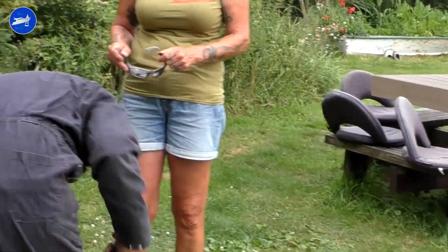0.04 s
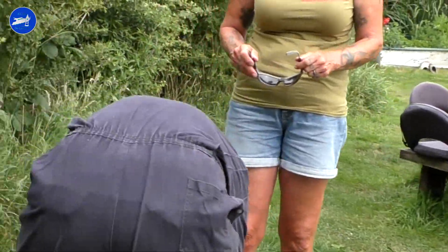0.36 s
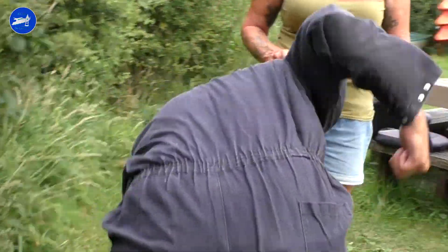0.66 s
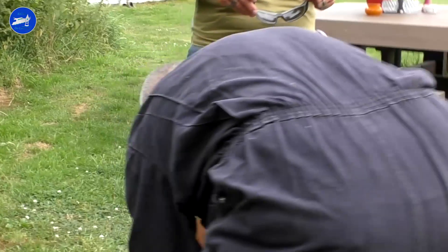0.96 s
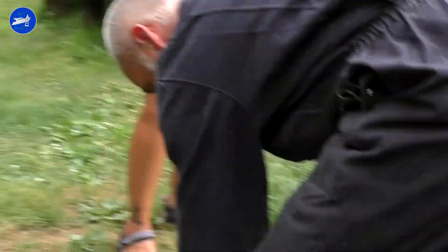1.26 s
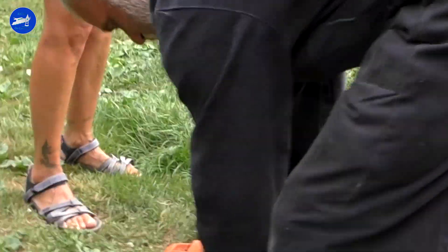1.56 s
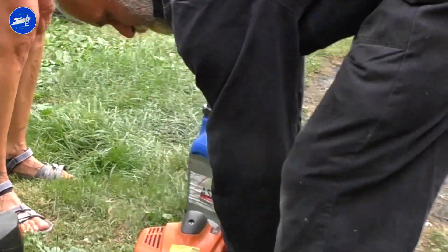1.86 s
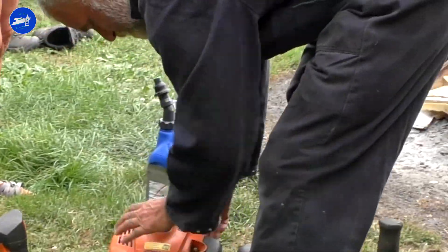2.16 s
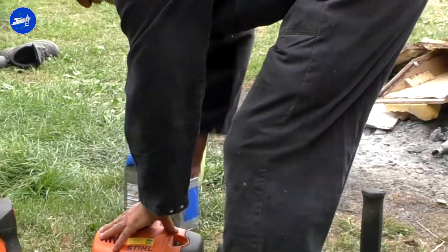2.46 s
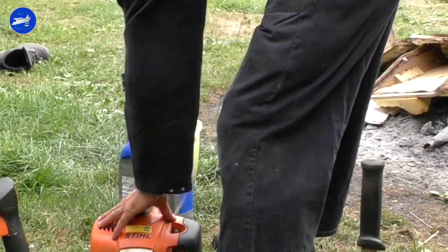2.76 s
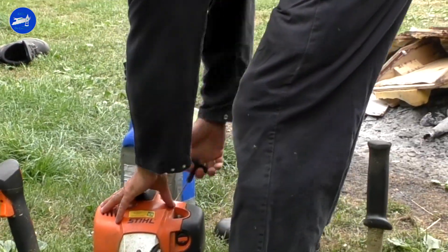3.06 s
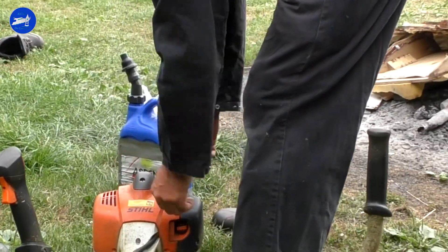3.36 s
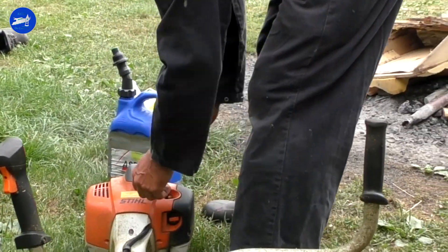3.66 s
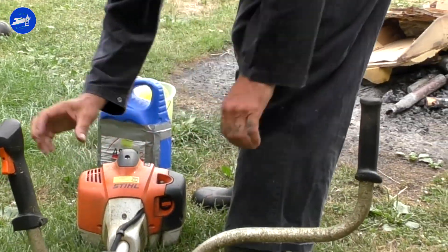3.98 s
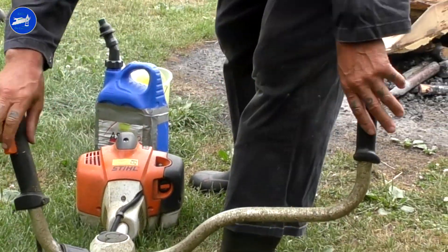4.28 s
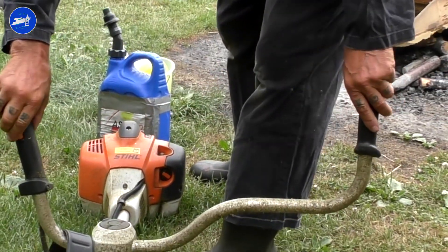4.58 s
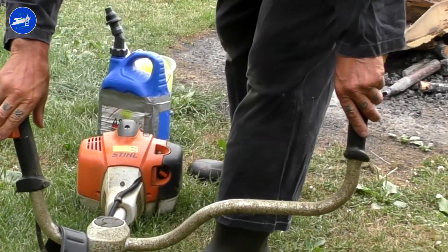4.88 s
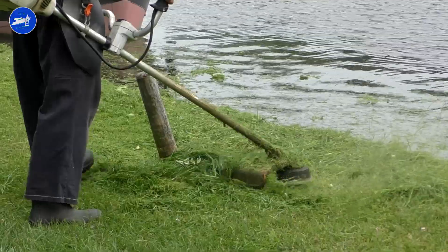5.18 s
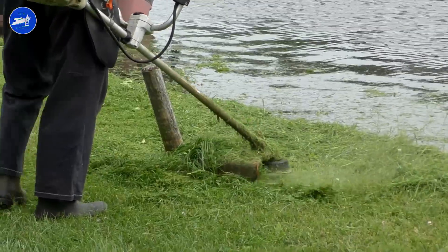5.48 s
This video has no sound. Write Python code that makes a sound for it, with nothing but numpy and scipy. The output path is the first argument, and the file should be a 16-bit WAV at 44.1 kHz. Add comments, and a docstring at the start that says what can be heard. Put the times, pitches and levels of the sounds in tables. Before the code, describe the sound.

A two-stroke petrol brush cutter is heard close up on a quiet lawn. At first the engine runs down, throbbing and rattling, with starter clacks until about 0.6 seconds and a faint bird behind. The rope whirrs at 0.7 seconds; the engine coughs unevenly, slows and dies with a few knocks by 2.1 seconds. In the lull the bird gives thin falling whistles and the starter clicks. Another pull at 2.7 seconds makes it catch at 3 seconds, popping with a tinny metallic ring and gathering speed. From 4.1 seconds the cutting line spins up with a rising swish; near 4.8 seconds the firing stops and it coasts. At 5.2 seconds the sound jumps abruptly to the machine working at high revs, a raspy buzz. From 5.4 seconds the line bites into grass with a dense patter and snapping stalks.

```python
"""A lawn, microphones close to a two-stroke petrol brush cutter. The engine runs down, a small bird calling
faintly behind it. The rope is pulled; the engine coughs and dies, and the bird calls in the lull. At 3 s
it catches, fires on every third turn and gathers speed, ringing its muffler and clutch drum. From 4.1 s
the cutting line spins up with a swish of eddies, then coasts. At 5.2 s we are abruptly with the machine
at work, every turn firing, and the line bites into the grass."""
import sys
import numpy as np
from scipy import signal
from scipy.fft import rfft, irfft
from scipy.io import wavfile
from scipy.ndimage import uniform_filter1d

SR = 44100
rng = np.random.default_rng(int(sys.argv[2]) if len(sys.argv) > 2 else 0)


def master_out(mix):
    """Clip the mix to full scale and print it as 16-bit PCM to the path in sys.argv[1]."""
    frames = np.transpose(np.atleast_2d(mix))
    ceiling = np.clip(frames, -1, 1)
    pcm = np.round(ceiling * 32767).astype(np.int16)
    wavfile.write(sys.argv[1], SR, pcm)


N = 243873
T = np.arange(N) / SR

# the quiet of the garden: (frequency [Hz], relative level [dB])
GARDEN = [(15, -54), (25, -32), (43, 5), (149, 2.5), (317, -6), (503, -10), (600, -26), (840, -20.5),
          (1330, -13.5), (3340, -23.5), (7110, -37), (12500, -34), (16000, -56)]
# bird notes: (start [s], length [s], glide [s], from [Hz], to [Hz], level [dB])
BIRD_NOTES = [(0.247, 0.12, .11, 3600, 3380, -62), (.44, 0.04, .04, 5000, 4850, -66),
              (1.986, 0.035, 0.025, 6900, 4500, -59), (2.325, 0.09, .042, 6560, 3650, -63),
              (2.43, .06, .06, 3980, 3930, -74)]
# left microphone over right: (frequency [Hz], level [dB])
LEFT_BIAS = [(300, 0), (1200, -.5), (4000, 1.6), (8000, 1), (14000, 3.8)]

# the rope running out or winding back: (start [s], end [s], whirr [dB], spool song, relative [dB])
ROPE_RUNS = [(-.1, -0.019, -32.5, -48.5), (0.676, 0.827, -27, -56), (2.01, 2.222, -56.5, -106),
             (2.707, 2.862, -29, -59)]
# starter pawls: (time [s], relative level [dB], t60 [s], pitch [Hz], cover clink offset [dB])
PAWL_CLACKS = [(0.179, -40.5, 0.24, 1140, -15), (0.384, -46, 0.084, 2250, -6),
               (0.396, -41, 0.27, 1470, -19), (0.426, -51.5, 0.25, 2120, 6.5), (0.441, -48, 0.12, 1600, -8),
               (0.474, -47.5, 0.074, 2420, -5), (0.492, -40, 0.54, 1360, -2), (0.567, -49, 0.14, 1500, -10),
               (0.574, -51, 0.08, 3000, -12), (0.588, -37.5, 0.11, 1150, -15),
               (0.613, -39.5, 0.25, 2980, -18), (1.966, -48, 0.07, 2100, -10), (2.025, -48, 0.056, 3260, 9),
               (2.036, -39.5, 0.096, 2240, -19), (2.18, -55, 0.06, 2480, -12),
               (2.514, -36.5, 0.32, 1530, -8.5), (2.594, -48, 0.59, 1830, -2), (2.622, -51, 0.1, 2100, 3)]
# jingles of the recoil spring; snaps of the starter and of stalks: (time [s], relative level [dB])
JINGLES = [(0.18, -61), (0.388, -69), (0.426, -69.5), (2.501, -67), (2.519, -69)]
SNAPS = [(0.58, -27), (0.781, -25.5), (5.42, -34), (5.461, -28), (5.5244, -28)]
# the last piston knock of each run-down: (time [s], crank speed [turns/s], relative level [dB])
LAST_KNOCKS = [(0.367, 9.24, -49.5), (2.119, 6.36, -44.5)]

# the spinning line's swish: (time [s], centre [Hz])
SWISH_PITCH = [(4.1, 2450), (4.33, 3915), (4.42, 4256), (4.55, 4627), (4.66, 4214), (4.78, 5080),
               (5.0, 3760), (5.212, 3250)]
# the exhaust at work in the grass: (time [s], note [dB], rasp, relative [dB])
WORK_LEVELS = [(5.208, -38.5, -37), (5.33, -35, -32), (5.43, -29, -31.5), (5.53, -39, -37)]
# its note: (multiple of the crank speed, relative level [dB])
EXHAUST_HARMONICS = [(1, 0), (2, -3), (3, -13), (4, -8), (5, -7), (6, -8), (7, -7), (8, -19), (9, -16),
                     (10, -12), (11, -4), (12, -13), (13, -16), (14, -15), (15, -9), (16, -9), (17, -15),
                     (18, -16)]

# the crank, one curve for each of three runs, then at work: (time [s], speed [turns/s])
RUN_SPEEDS = [
    [(-.1, 40), (.1, 19.3), (.4, 8)],
    [(.62, 41.4), (.68, 48.7), (.74, 49.7), (.93, 59.7), (1.1, 52.1), (1.3, 36.6), (1.36, 37.3),
     (1.5, 28.3), (1.57, 36), (1.65, 27.5), (1.745, 21), (2.15, 5.2)],
    [(2.65, 46), (2.8, 45.05), (2.89, 39.94), (2.99, 48.94), (3.09, 45.05), (3.14, 53.61), (3.22, 52.82),
     (3.534, 65.7), (3.59, 66.6), (3.67, 70.4), (3.85, 72.3), (4.05, 80.3), (4.2, 80.1), (4.35, 81.7),
     (4.54, 79.3), (4.68, 78.7), (4.73, 95.55), (5.0, 68), (5.21, 55)],
]
WORK_SPEED = [(5.21, 96), (5.32, 113), (5.41, 123), (5.53, 121)]
# the two tries that die, relative levels: (intake [dB], rattle [dB])
FAILED_TRIES = [(-27.5, -35), (-26, -31.5)]
# intake on the run that catches, falling as the throttle shuts: (time [s], relative level [dB])
WARM_INTAKE = [(2.651, -35), (2.68, -33), (3.2, -31.5), (4.3, -32.5), (4.62, -35.5), (4.75, -31),
               (4.82, -45), (5.21, -48)]
# the gulps of one cold turn: (lead on the main gulp [turns], relative level [dB])
COLD_GULPS = [(0, 0), (.25, -7.5), (.47, -8), (.72, -9.5)]
# the warm engine's smaller gulp: (crank speed [turns/s], lead on the main gulp [turns])
EARLY_GULP = [(45, .378), (54, .35), (62, .355), (71, .38), (81, .405)]
# stray firings before it catches: (time [s], crack, relative [dB], puff, relative [dB])
COUGHS = [(0.7328, -13, -36.5), (0.7916, -11.5, -40.5), (0.831, -17.5, -44), (0.8662, -18, -42.5),
          (0.899, -14.5, -42.5), (0.935, -22.5, -46), (0.967, -12, -41.5), (1.058, -11, -39.5),
          (1.1365, -10.5, -37), (1.3258, -17, -38), (1.4392, -23, -40.5), (1.5363, -17, -35),
          (1.705, -18, -46), (2.771, -26, -34.5), (2.837, -16, -33.5), (2.932, -16.5, -39)]

# spectra of the machine and the thrashed grass, heard close: (frequency [Hz], relative level [dB])
AIRBOX_COLD = [(30, -85), (55, -12), (90, -5), (140, 2), (210, 4), (310, 3.5), (400, -2.5), (490, -5.5),
               (580, -22), (680, -13), (900, -26.5), (1800, -107)]
AIRBOX_WARM = [(30, -61), (50, -15), (70, -4.5), (120, -5), (160, 0), (220, 5.5), (280, 4.5), (350, 3),
               (410, 3.5), (480, -2), (560, -13.5), (700, -30.5), (1800, -75)]
CASING = [(40, -94), (300, -11.5), (700, -9), (1100, 1.5), (1550, 7.5), (2000, 3), (2600, 0.5), (3600, -9),
          (5000, -12), (7500, -33.5), (15000, -53)]
HISS = [(100, -77), (1500, -22), (3000, 9), (4500, 4), (6300, 1), (7300, -3.5), (9000, 0), (12000, -3),
        (16000, -13)]
MUFFLER = [(40, -5), (400, -43), (900, 5.5), (1400, 2.5), (2000, 10), (2600, 1.5), (3500, 2.5), (4300, 5),
           (5400, 7), (6400, 5), (7400, -1.5), (9000, 2), (12000, 3), (16000, -10)]
CRACK = [(40, -66), (300, -25), (700, -40), (1300, 16.5), (2500, 16.5), (4200, 10), (7000, -17),
         (15000, -33)]
SNAP = [(60, -34), (400, -5), (1200, -3), (3000, 4.5), (5000, -1.5), (7500, -4.5), (11000, -2),
        (16000, -22)]
RASP = [(30, -55), (100, -14), (260, -2), (450, -13), (900, -13), (1350, -5), (1550, -4), (2650, -3.5),
        (4670, -8), (5430, -7), (6200, -12), (10900, -13.5), (16000, -26)]
GRASS = [(40, -28), (130, 7), (270, 5), (400, -4), (650, -1.5), (1350, -9.5), (2400, -19), (4000, -14),
         (12000, -25)]

# recoil spring, starter cover and clutch drum: (frequency [Hz], relative level [dB], t60 [s])
SPRING_MODES = [(7750, -3, .25), (8030, 0, .3), (8330, -1, .25), (8700, -4, .2), (9850, -5, .1),
                (10800, -2, .12)]
COVER_MODES = [(1120, -7, .06), (1420, -5, .07), (1590, 0, .09), (2080, -6, .05), (2480, -6, .04),
               (3050, -9, .04), (3700, -9, .04)]
DRUM_MODES = [(2146, 0, .11), (2120, -10, .06), (4280, -15, .08)]
# the muffler's chambers, its lower ring when cold, its warm gas: columns as above
CHAMBER_MODES = [(2610, -6, .07), (4210, -2, .11), (4590, -4, .08), (4682, -1, .1), (4941, -3, .09),
                 (5040, -5, .08), (5258, -4, .08), (5570, -7, .08), (6052, -8, .08), (6350, -5, .09),
                 (6757, -8, .08), (9044, -10, .08)]
COLD_MODES = [(3208, -10, .12), (3790, -1, .14), (4095, 0, .15), (4330, -5, .13), (4730, -3, .13)]
GAS_MODES = [(3240, -7, .08), (4215, -2, .08)]
# the muffler's thin plates: (frequency [Hz], relative level [dB])
PLATE_MODES = [(6412, -51.5), (6788, -64), (8290, -59), (8796, -59), (9044, -78), (9356, -53.5),
               (10099, -58), (10907, -60.5), (11440, -59), (11703, -62), (12263, -65), (12796, -58),
               (12893, -67)]

WARM_START_S, WARM_END_S = RUN_SPEEDS[-1][0][0], RUN_SPEEDS[-1][-1][0]
CAUGHT_S, MISFIRE_S, THROTTLE_SHUT_S = 2.9979, 3.57, 4.77


def amp(db):
    """Decibels to gain."""
    return 10 ** (np.asarray(db) / 20)


def unit_rms(x):
    """Scales to an rms of one."""
    return x / np.sqrt(np.mean(x ** 2) + 1e-20)


def spectrum_at(points, hz):
    """Reads a spectrum on a log-frequency axis."""
    f, db = np.transpose(points)
    return np.interp(np.log(hz + 1), np.log(f + 1), db)


def during(start, end):
    """One between two times, silent outside."""
    return uniform_filter1d(1. * (T >= start) * (T <= end), size=90)


def fader(times, db):
    """A gain curve that is silent outside its own span."""
    return amp(np.interp(T, times, db)) * during(times[0], times[-1])


def ramp(start, rise_s):
    """Climbs from zero to one and stays there."""
    return np.clip((T - start) / rise_s, 0, 1)


def add(mix, s, sound):
    """Mixes a sound in at time s."""
    part = mix[max(round(s * SR), 0):][:len(sound)]
    part += sound[:len(part)]


def colour(x, points, size=8192):
    """Causal filter of unit energy with the given spectrum."""
    log_gain = np.log(amp(spectrum_at(points, abs(np.fft.fftfreq(size, 1 / SR)))))
    taps = np.fft.ifft(np.exp(np.conj(signal.hilbert(log_gain)))).real[:size // 2]
    return signal.oaconvolve(x, taps / np.linalg.norm(taps))[:N]


def resonate(x, hz, width_hz, stages=1):
    """A resonance that follows the curve hz; more stages steepen its skirts."""
    carrier = np.exp(2j * np.pi * np.cumsum(hz * np.ones(N)) / SR)
    pole = np.exp(-np.pi * width_hz / SR)
    for _ in range(stages):
        x = 2 * (carrier * signal.lfilter([1 - pole], [1, -pole], x / carrier + 1e-18)).real
    return x


def noise():
    """White noise."""
    return rng.standard_normal(N)


def waver(size):
    """Random drift with an rms of one, smoothed over size samples."""
    return unit_rms(uniform_filter1d(noise(), size=size))


def grains(per_s, spread_db, cap):
    """Sparse random clicks, some boosted by up to cap times spread_db."""
    clicks = noise() * amp(spread_db * np.minimum(rng.exponential(1, N), cap))
    return clicks * (rng.random(N) < per_s / SR)


def ticks(turns, spread_db):
    """One impulse a turn, of uneven size, scaled so that speeding up adds no power."""
    step = np.diff(turns)
    at = np.flatnonzero(np.diff(np.floor(turns)) > 0)
    out = np.zeros(N)
    out[at] = amp(spread_db * rng.standard_normal(len(at))) / np.sqrt(np.maximum(step[at], 10 / SR))
    return out


def ring(modes, spread_db, tuning=1, size=9000):
    """Dying modes; every blow excites them a little differently."""
    t = np.arange(size) / SR
    out = np.zeros(size)
    for hz, db, t60 in modes:
        decay = amp(db + spread_db * rng.standard_normal() - 60 * t / t60)
        out += decay * np.sin(2 * np.pi * (hz * tuning * t + rng.random()))
    return out * (1 - np.exp(-t / .0008))


def burst(t60, rise_s, size=9000):
    """A puff of noise that dies away."""
    t = np.arange(size) / SR
    return rng.standard_normal(size) * amp(-60 * t / t60) * (1 - np.exp(-t / rise_s))


def garden(db):
    """The place itself: a steady low rumble with a little hiss."""
    return amp(db) * colour(noise(), GARDEN)


def ground_scatter(x, t60=.063, size=9000):
    """Short, thin reflections reaching one microphone from the ground and nearby things."""
    t = np.arange(size) / SR
    taps = rng.standard_normal(size) * (rng.random(size) < 3000 / SR) * amp(-60 * t / t60)
    echoes = signal.oaconvolve(x, taps / np.linalg.norm(taps))[:N]
    return colour(echoes, [(300, -12), (800, -1), (4000, 2), (14000, .5)])


def bird(waver_share=.014, hold_db=-7):
    """Faint, wavering whistles in the background that slur down and soften towards their last pitch."""
    out = np.zeros(N)
    for s, length, glide, from_hz, to_hz, db in BIRD_NOTES:
        t = np.arange(round(length * SR)) / SR
        falling = np.maximum(1 - t / glide, 0) ** 1.5
        hz = (to_hz + (from_hz - to_hz) * falling) * (1 + waver_share * waver(60)[:len(t)])
        shape = np.sqrt(np.sin(np.pi * t / length)) * amp(hold_db * np.minimum(t / glide, 1))
        add(out, s, amp(db) * shape * np.sin(2 * np.pi * np.cumsum(hz) / SR))
    return out


def rope(rise_s=.044, fade_db_per_s=188):
    """Each run of the starter rope swells, holds and fades: gains of its whirr and of the spool's song."""
    whirr, song = np.zeros((2, N))
    for start, end, whirr_db, song_db in ROPE_RUNS:
        shape = ramp(start, rise_s) ** .5 * amp(-fade_db_per_s * np.maximum(T - end, 0))
        whirr += amp(whirr_db) * shape
        song += amp(song_db) * shape
    return whirr, song


def recoil(song_gain, spool_hz=6610):
    """The recoil spring jingles and the spool sings thinly."""
    jingles = np.zeros(N)
    for s, db in JINGLES:
        add(jingles, s, amp(db) * ring(SPRING_MODES, spread_db=3))
    song = unit_rms(resonate(noise(), spool_hz, width_hz=110, stages=2))
    return jingles + amp(4.5) * song_gain * song


def piston_knocks(count=6, friction=37.5, db_per_octave=4.5):
    """One knock a turn as friction [turns/s^2] stops the crank: (time [s], relative level [dB])."""
    rows = []
    for last_s, last_speed, db in LAST_KNOCKS:
        for speed in np.sqrt(last_speed ** 2 + 2 * friction * np.arange(count)):
            s = last_s - (speed - last_speed) / friction
            rows.append((s, db + db_per_octave * np.log2(speed / last_speed)))
    return rows


def casing_blows(knock_hz=2350, knock_t60=.13, scrape_s=.0016, band_hz=900):
    """Pawls and piston scrape and knock on the casing, each at its own pitch, and the cover clinks."""
    knocks, edges, clinks = np.zeros((3, N))
    blows = [(*clack, -26) for clack in PAWL_CLACKS]
    for s, db in piston_knocks():
        blows.append((s, db, knock_t60, knock_hz * (1 + .08 * rng.standard_normal()), -5, -29))
    for s, db, t60, hz, clink_db, edge_db in blows:
        add(knocks, s, amp(db - 11) * burst(t60 / 2, scrape_s))
        peak = signal.iirpeak(hz, hz / band_hz, fs=SR)
        band = signal.lfilter(*peak, signal.lfilter(*peak, burst(t60 / 2, scrape_s)))
        add(clinks, s, amp(db + 1) * band / band[:400].std() / 2)
        add(clinks, s, amp(db + clink_db) * ring(COVER_MODES, spread_db=3))
        add(edges, s, amp(db + edge_db) * burst(t60, scrape_s))
    return clinks + colour(knocks, CASING) + colour(edges, HISS)


def snaps():
    """Short, bright snaps of the starter and, later, of stalks in the line."""
    out = np.zeros(N)
    for s, db in SNAPS:
        add(out, s, amp(db + 2.5) * burst(t60=.014, rise_s=.00022))
    return colour(out, SNAP)


def cutting_line(hz_per_pass=33, swing_share=.055, whip_share=.045, gust_db=.9, db_per_octave=13.5):
    """The line sheds gusty eddies, higher and louder with speed; each end rises as it swings closer."""
    times, hz = np.transpose(SWISH_PITCH)
    pitch = np.interp(T, times, hz)
    swing = 2 * np.pi * np.cumsum(pitch / hz_per_pass) / SR
    centre = pitch * (1 + swing_share * np.sin(swing) + whip_share * waver(150))
    eddies = resonate(noise(), centre, width_hz=1000, stages=2)
    eddies *= amp(gust_db * waver(250)) * (1 + .081 * np.cos(swing))
    gain = amp(-31.5 + db_per_octave * np.log2(pitch / 4000))
    gain *= during(times[0], times[-1]) * ramp(times[0], rise_s=.1)
    return gain * (unit_rms(eddies) + amp(-14) * colour(noise(), HISS))


def loaded_for(s):
    """Seconds since the cutting line began to spin."""
    return np.maximum(s - SWISH_PITCH[0][0], 0)


def thrashed_grass(bite):
    """The line strikes a dense patter of stalks."""
    stalks = grains(per_s=2500, spread_db=3, cap=4)
    return amp(-33.5) * bite * unit_rms(colour(stalks, GRASS))


def engine_at_work(bite, flutter_share=.003, uneven_db=1.2, bite_loss=.6):
    """Every turn fires: exhaust note, puffing rasp and line hum; note and hum sink as the line bites."""
    times, note_db, rasp_db = np.transpose(WORK_LEVELS)
    speed = np.interp(T, *np.transpose(WORK_SPEED))
    flutter = flutter_share * (1 + 5 * bite) * waver(900)
    turns = np.cumsum(speed * (1 + flutter)) / SR
    note = sum(amp(db) * np.sin(2 * np.pi * (k * turns + rng.random())) for k, db in EXHAUST_HARMONICS)
    note = unit_rms(note) * amp(uneven_db * waver(400))
    line_phase = 2 * np.pi * 1.4 * turns  # 1.4 line ends pass for each turn of the crank
    hum = amp(-5) * np.sin(line_phase) + amp(-10) * np.sin(2 * line_phase)
    blast = unit_rms(noise() * (.45 + np.sin(np.pi * (turns % 1) ** .6) ** 4))
    heat = (speed / 114) ** .39  # the pipe's resonances rise as the gas gets hotter
    pipe = resonate(blast, 5350 * heat, width_hz=210) + .19 * resonate(blast, 8150 * heat, width_hz=230)
    rasp = colour(blast, RASP) + 3.5 * (1 - bite) * pipe
    tone = (1 - bite_loss * bite) * (note + hum)
    return fader(times, note_db) * tone + fader(times, rasp_db - .8) * rasp


def speed_at(s):
    """Crank speed [turns/s] during the three starting runs."""
    return np.interp(s, *np.concatenate(RUN_SPEEDS).T)


def crank():
    """Crank angle [turns], eased so that coughs and knocks fall near whole turns."""
    turns = np.cumsum(speed_at(T)) / SR
    beats = np.sort([row[0] for row in COUGHS + piston_knocks()] + [CAUGHT_S])
    slip = np.interp(T, beats, np.unwrap(np.interp(beats, T, turns), period=1))
    return turns - uniform_filter1d(slip, size=7000)  # the flywheel smooths it


def stall_gain():
    """A slow crank goes quiet: 27 dB down at 10 turns a second."""
    return amp(-27 * (10 / speed_at(T)) ** 1.67)


def failed_tries(swell_s=.031):
    """Each cold try swells, then fades as the crank slows: gains of its intake and of its rattle."""
    intake, shake = np.zeros((2, N))
    for curve, (intake_db, rattle_db) in zip(RUN_SPEEDS, FAILED_TRIES):
        start, end = curve[0][0], curve[-1][0]
        turning = during(start, end) * stall_gain() * ramp(start, swell_s) ** .5
        intake += amp(intake_db) * turning
        shake += amp(rattle_db) * turning
    return intake, shake


def throb(turns):
    """A gain that jumps once a turn and sinks back."""
    return unit_rms(.64 + np.exp(-(turns % 1) / .1))


def piston_slap(turns, cold_shake, lag_turns=.62, hz=1590):
    """The cold piston slaps once a turn, after the firing point."""
    slaps = resonate(ticks(turns - lag_turns, spread_db=2), hz, width_hz=240, stages=2)
    return amp(-14.5) * cold_shake * unit_rms(slaps)


def rattle(turns, cold_shake, whirr, db_per_octave=7, coast_db=-3):
    """Gritty casing, chattering cover and hiss throb with the crank and swell with speed and the rope."""
    grit = unit_rms(grains(per_s=4000, spread_db=1, cap=3))
    casing = amp(-7.5) * colour(grit * throb(turns), CASING)
    chatter = amp(-21) * unit_rms(signal.oaconvolve(casing, ring(COVER_MODES, spread_db=0))[:N])
    hiss = colour(noise() * throb(turns), HISS)
    warm_db = -33.5 + db_per_octave * np.log2(speed_at(T) / 50) + coast_db * (T > THROTTLE_SHUT_S)
    shake = cold_shake + during(WARM_START_S, WARM_END_S) * amp(warm_db)
    hiss_gain = np.hypot(amp(-15) * shake * stall_gain(), amp(-13) * whirr)
    return np.hypot(shake, whirr) * (casing + chatter) + hiss_gain * hiss


def choke_air(turns, cold_gain, warm_gain):
    """Air tumbles past the choke, throbbing with the crank."""
    churn = colour(noise() * throb(turns), AIRBOX_COLD)
    return (amp(-11) * cold_gain + amp(-8.5) * warm_gain) * churn


def kick(fired_s, fade_s=.015):
    """Jumps to one at each firing and fades."""
    since = T - fired_s[np.maximum(np.searchsorted(fired_s, T) - 1, 0)]
    return np.exp(-abs(since) / fade_s) * (since > 0)


def gulps(turns, fired_s, pattern, thump, spread_db, echo_db, kick_turns, echo_s=.0042):
    """The piston pumps the same few gulps every turn; each bounces once in the duct."""
    speed = np.maximum(np.gradient(turns) * SR, 40)
    drift = unit_rms(uniform_filter1d(waver(700), size=500))
    stumble = .004 * (50 / speed) ** 3 * drift  # a slow flywheel runs unevenly
    angle = np.interp(T + .003, T, turns) + kick_turns * kick(fired_s) + stumble
    pulses = sum(amp(db) * ticks(angle + lead, spread_db) for lead, db in pattern)
    pulses *= 1 + thump * kick(fired_s - .004) ** 2  # a firing swells the gulp under it
    return pulses - amp(echo_db) * np.interp(T - echo_s, T, pulses)


def air_box(turns, fired_s, cold_gain, warm_gain):
    """The gulps boom through the air box, ragged when cold and steadier on the run that catches."""
    cold = gulps(turns, fired_s, COLD_GULPS, thump=.45, spread_db=2.5, echo_db=-12.5, kick_turns=.06)
    lead = np.interp(speed_at(T), *np.transpose(EARLY_GULP))
    warm = gulps(turns, fired_s, [(0, 0), (lead, -6)], thump=0, spread_db=.74, echo_db=-9, kick_turns=.125)
    return (amp(2) * warm_gain * colour(warm, AIRBOX_WARM)
            - amp(-9.5) * cold_gain * colour(cold, AIRBOX_COLD))


def ignition(turns, turns_per_firing=3, db_per_octave=-5, soften_db_per_s=4):
    """The coughs, then regular firings, weaker as the charge has less time to fill: rows as in COUGHS."""
    counted = turns - np.round(np.interp(CAUGHT_S, T, turns))
    counted -= T > MISFIRE_S  # one misfire puts the beat back by a turn
    s = T[1:][np.diff(np.floor(counted / turns_per_firing)) > 0]
    s = s[(s > CAUGHT_S - .01) & (s < THROTTLE_SHUT_S)]
    puff_luck, crack_luck = rng.standard_normal((len(s), 2)).T
    puff_db = -32.5 + db_per_octave * np.log2(speed_at(s) / 50) + .6 * puff_luck
    crack_db = puff_db + 21.5 + 1.5 * crack_luck - soften_db_per_s * loaded_for(s)
    return np.vstack([COUGHS, np.c_[s, crack_db, puff_db]])


def clutch_drum(s, slip_speed=76.8, slip_width=6.4, grip_db_per_s=9):
    """The drum rings most while its shoes slip, near slip_speed [turns/s], and less under load."""
    off_slip = (speed_at(s) - slip_speed) / slip_width
    return amp(13 - off_slip ** 2 - grip_db_per_s * loaded_for(s)) * ring(DRUM_MODES, spread_db=.43)


def muffler_ring(s, cold, heat_spread=.006, flat_share=.05, warming_s=.3, plate_t60=.09):
    """One firing rings the muffler's chambers and thin plates, pitched by the heat of the gas."""
    heat = 1 + heat_spread * rng.standard_normal()
    cold_db = -5 * cold
    chambers = amp(1 + cold_db) * ring(CHAMBER_MODES, spread_db=4, tuning=heat)
    if cold:
        chambers += ring(COLD_MODES, spread_db=3, tuning=heat)
    else:
        flat = flat_share * np.exp(-max(s - CAUGHT_S, 0) / warming_s)
        chambers += amp(1) * ring(GAS_MODES, spread_db=3, tuning=heat * (1 - flat))
    plates = ring([(hz, db, plate_t60) for hz, db in PLATE_MODES], spread_db=5, tuning=np.sqrt(heat))
    return chambers, amp(-4 + cold_db) * plates / plates[:200].std()


def exhaust(firings, cold_air_db=-2.5):
    """Each firing cracks as the port opens, blows a puff through the muffler and rings the metal."""
    cracks, puffs, metal = np.zeros((3, N))
    baffle_hz = np.linspace(1000, 15000, 48) + rng.uniform(-130, 130, 48)
    baffles = ring([(hz, 0, .075) for hz in baffle_hz], spread_db=4)  # the same on every firing
    baffles /= baffles[:200].std()
    pressure_step = np.r_[-1, np.zeros(14), .5]
    for s, crack_db, puff_db in firings:
        cold = s < WARM_START_S
        add(cracks, s + .0008, amp(crack_db + 5.5) * pressure_step)
        add(cracks, s + .0008, amp(crack_db - 14) * burst(t60=.035, rise_s=.001))
        add(puffs, s, amp(puff_db + 4.5 + cold * cold_air_db) * burst(t60=.14, rise_s=.0014))
        add(puffs, s + .001, amp(puff_db - 7) * baffles)
        chambers, plates = muffler_ring(s, cold)
        add(metal, s + .001, amp(puff_db) * chambers)
        add(metal, s + .00077, amp(puff_db) * plates)
        add(metal, s + .000962, amp(puff_db) * clutch_drum(s))
    return colour(cracks, CRACK) + colour(puffs, MUFFLER) + metal


def starting_engine(whirr):
    """Close up, two tries that die and one that catches, all timed by the one crank."""
    turns = crank()
    firings = ignition(turns)
    cold_intake, cold_shake = failed_tries()
    warm_intake = fader(*np.transpose(WARM_INTAKE))
    boom = air_box(turns, firings[:, 0], cold_intake, warm_intake)
    clatter = piston_slap(turns, cold_shake) + rattle(turns, cold_shake, whirr)
    return boom + clatter + choke_air(turns, cold_intake, warm_intake) + exhaust(firings)


def scene():
    """The machine close and central; each microphone also gets its own scatter and garden air."""
    whirr, spool_song = rope()
    bite = ramp(5.405, rise_s=.035)  # the line meets the grass
    centre = starting_engine(whirr) + casing_blows() + recoil(spool_song) + snaps()
    centre += cutting_line() + engine_at_work(bite) + thrashed_grass(bite)
    centre += bird() + garden(db=-58.5)
    return np.array([centre + amp(-11.5) * ground_scatter(centre) + garden(db=-66.5) for mic in range(2)])


def record(dry, cutoff_hz=16300):
    """A stereo pair, the left microphone a little brighter, with the very top cut off."""
    bias_db = spectrum_at(LEFT_BIAS, np.fft.rfftfreq(N, 1 / SR)) / 2
    heard = irfft(rfft(dry) * amp([bias_db, -bias_db]), N)
    lowpass = signal.firwin(511, cutoff_hz, window=("kaiser", 9), fs=SR)
    return signal.oaconvolve(heard, lowpass[None], "same")


dry = scene()
out = record(dry)
master_out(out)
```